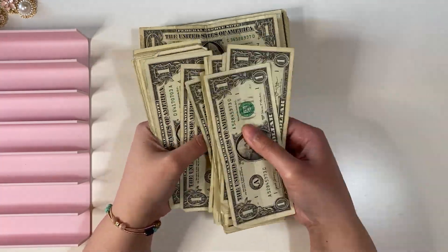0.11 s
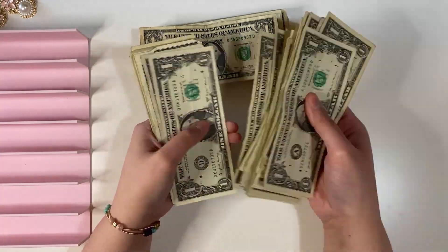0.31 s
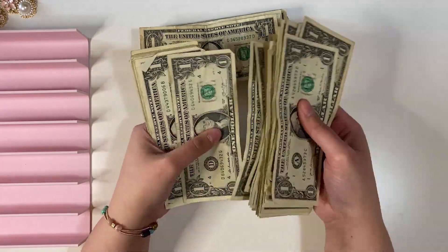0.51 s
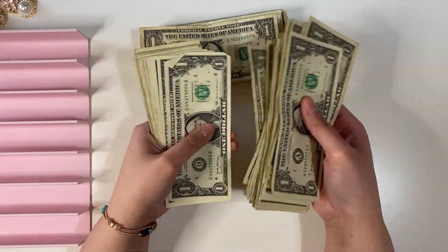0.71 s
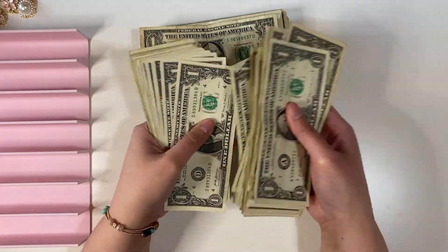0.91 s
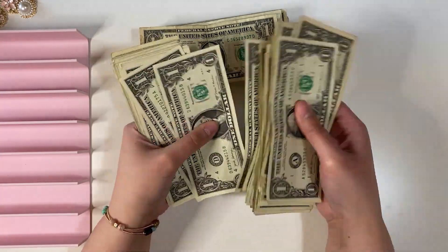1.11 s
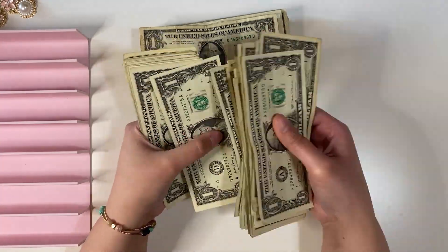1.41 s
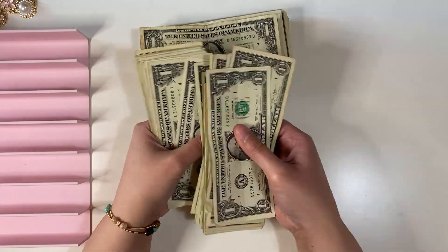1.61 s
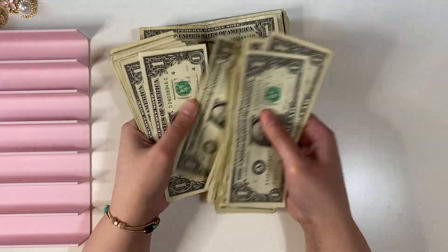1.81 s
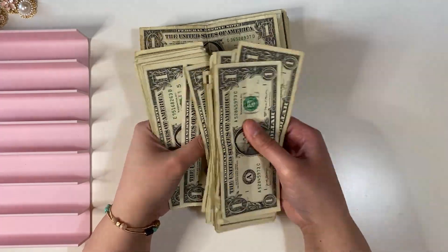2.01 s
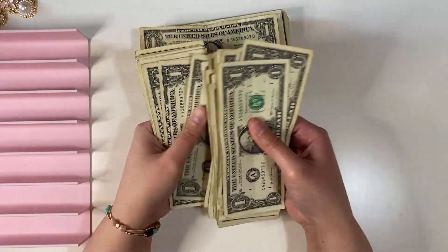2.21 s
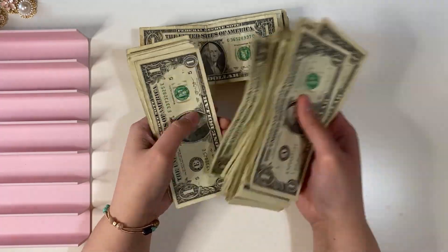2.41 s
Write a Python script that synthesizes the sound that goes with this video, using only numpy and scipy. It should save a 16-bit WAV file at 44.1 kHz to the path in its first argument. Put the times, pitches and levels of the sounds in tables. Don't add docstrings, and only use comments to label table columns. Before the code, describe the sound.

Thumbed banknotes rustle and flick one after another, brief dry hisses leading into dull papery pops and a few sharp snaps; close phone pickup, nearly mono, very short desk reflection, quiet indoor room.

```python
import sys
import numpy as np
from scipy import signal
from scipy.fft import rfft, irfft
from scipy.io import wavfile
from scipy.ndimage import uniform_filter1d

SR = 44100
rng = np.random.default_rng(int(sys.argv[2]) if len(sys.argv) > 2 else 0)


def unload_audio(sound):
    columns = np.transpose(np.atleast_2d(sound))
    steps = np.round(np.clip(columns, -1, 1) * 32767)
    wavfile.write(sys.argv[1], SR, steps.astype(np.int16))


def volts_from_decibels(level):
    exponent = np.asarray(level, float) / 20
    return 10 ** exponent


N = 114660


def unit(x):
    return x / np.sqrt(np.mean(x ** 2))


def band(x, hz, width_hz):
    return signal.lfilter(*signal.iirpeak(hz, hz / width_hz, fs=SR), x)


def bands(x, table):
    return unit(sum(volts_from_decibels(db) * band(x, hz, width_hz) for hz, width_hz, db in table))


def highpass(x, order, hz):
    return signal.sosfilt(signal.butter(order, hz, "high", fs=SR, output="sos"), x)


def curve(table, hz):
    table = np.array(table, float)
    return np.interp(np.log(hz + 1), np.log(table[:, 0]), table[:, 1])


def add(out, start_s, x):
    i = int(start_s * SR)
    out[i:i + len(x)] += x[:N - i]


def grit(per_s, spread_db, hiss):
    chance, sign, size = rng.random((3, N))
    slips = (chance < per_s / SR) * np.sign(sign - 0.5) * volts_from_decibels(spread_db * (2 * size - 1))
    return unit(slips) + hiss * rng.standard_normal(N)


def flicker(rate_hz, depth_db):
    hold = int(SR / rate_hz)
    steps = np.repeat(rng.standard_normal(N // hold + 1), hold)
    return volts_from_decibels(depth_db * unit(uniform_filter1d(steps, hold)[:N]))


# [start_s, length_s, hiss_db, pocket_ring_db, airy_db]
SLIDE_EVENTS = [(0, 0.11, -68, -65.5, -73.5), (0.166, 0.039, -62, -61.5, -64),
                (0.199, 0.03, -50.5, -53, -62.5), (0.308, 0.068, -61.5, -63.5, -67),
                (0.354, 0.043, -61, -62, -56.5), (0.507, 0.051, -58.5, -50.5, -63.5),
                (0.561, 0.029, -53.5, -48.5, -57), (0.623, 0.035, -72.5, -75.5, -72),
                (0.731, 0.088, -59, -58.5, -60), (0.853, 0.086, -69, -63.5, -73),
                (0.91, 0.033, -53.5, -69, -56.5), (0.945, 0.024, -64.5, -58, -66),
                (1.139, 0.13, -65.5, -62.5, -86), (1.212, .035, -56, -56.5, -55),
                (1.259, 0.017, -58.5, -58, -69.5), (1.359, 0.045, -56.5, -60, -63.5),
                (1.4, 0.043, -58.5, -52, -56.5), (1.495, 0.024, -56.5, -50.5, -63),
                (1.517, 0.024, -52, -51.5, -63), (1.56, 0.027, -66, -46.5, -48)]
LATER_SLIDE_EVENTS = [(1.671, 0.054, -60, -60, -65.5), (1.728, 0.022, -51, -40.5, -58.5),
                      (1.775, 0.029, -55, -56, -61.5), (1.913, 0.027, -56, -58.5, -61.5),
                      (1.936, 0.035, -46.5, -51.5, -53), (1.968, 0.026, -64.5, -63.5, -77),
                      (2.071, 0.069, -66, -70, -73), (2.131, 0.096, -61, -68, -68.5),
                      (2.215, 0.028, -55, -55.5, -67), (2.283, 0.026, -60, -53, -65.5),
                      (2.32, 0.027, -57, -43.5, -62.5), (2.422, 0.067, -58, -55.5, -60.5), ]
# [time_s, level_db]
CREEP_LEVELS = [(0, -72.5), (.1, -104), (.14, -92), (.2, -75), (.44, -72.5), (.48, -82.5), (.6, -76.5),
                (.84, -80.5), (1.05, -74), (1.12, -85), (1.2, -69), (1.33, -77.5), (1.6, -72.5),
                (1.86, -84), (1.95, -73), (2.04, -82.5), (2.2, -72), (2.6, -76)]
# [pitch_hz, width_hz, level_db]
PAPER_RINGS = [
    (2266, 660, 0.5),
    (2670, 340, -2.5),
    (3780, 270, 0.5),
    (5100, 1650, 1.5),
    (6440, 1100, -4.5),
]
# [pitch_hz, width_hz, level_db]
AIRY_RINGS = [
    (8830, 6600, 11),
    (14700, 2200, 2.5),
]


def slides():
    t = np.arange(N) / SR
    creep_db = np.interp(t, *np.array(CREEP_LEVELS, float).T)
    power = volts_from_decibels(2 * (creep_db + np.array([[0], [-1.5], [0]])))
    fade_share = 0.33
    for start_s, length_s, *levels_db in SLIDE_EVENTS + LATER_SLIDE_EVENTS:
        progress = (t - start_s) / length_s
        fade = np.clip(np.minimum(progress, 1 - progress) / fade_share, 0, 1)
        power += np.outer(volts_from_decibels(2 * np.array(levels_db)), fade ** 2)
    paper, pocket, air = np.sqrt(power) * flicker(150, depth_db=2.5)

    pocket_hz, pocket_width_hz = 950, 507
    ring = band(grit(300, spread_db=0.0, hiss=0.85), pocket_hz, pocket_width_hz)
    ring = unit(band(ring, pocket_hz, 3 * pocket_width_hz))

    crinkle = np.zeros(N)
    for hz, width_hz, db in PAPER_RINGS:
        wobble = flicker(200, depth_db=2.5)
        crinkle += volts_from_decibels(db) * wobble * band(grit(450, spread_db=1.5, hiss=0.81), hz, width_hz)

    breath = bands(highpass(grit(2390, spread_db=2.5, hiss=0.68), 4, 6500), AIRY_RINGS)
    return paper * unit(crinkle) + pocket * ring + air * breath


# [start_s, peak_db, settled_pitch_hz, swell_ms]
POP_EVENTS = [(0.202, -16.5, 987, 1.14), (0.2132, -28.5, 1070, 0.91), (0.2178, -33, 950, 1.6),
              (0.3294, -35.5, 1070, 1.2), (0.334, -30, 1010, 0.9), (0.3373, -16.5, 866, 1.62),
              (.3405, -27, 776, 1.2), (.351, -38, 1020, 1.9), (.539, -27.5, 950, 0.33),
              (0.5679, -25, 973, 1.97), (0.58, -38, 984, 2.1), (0.725, -45.5, 846, 2),
              (0.92, -47, 1300, 0.81), (0.9217, -20.5, 806, 0.89), (0.9238, -22, 879, 1.6),
              (.927, -34, 860, 3.5), (1.209, -36.5, 1080, 2.3), (1.236, -38, 1014, 2.4),
              (1.2587, -39.5, 754, 1.02), (1.407, -45, 990, 2.8)]
LATER_POP_EVENTS = [(1.5026, -38.5, 1266, 3.4), (1.5438, -27.5, 914, 0.85), (1.561, -34, 946, 2.1),
                    (1.567, -24, 1790, 1.09), (1.728, -41, 930, 2), (1.7313, -28, 679, 2),
                    (1.7346, -22.5, 950, 1.1), (1.7379, -26.5, 1046, 1.58), (1.779, -39.5, 872, 2.5),
                    (1.92, -32.5, 680, 1.04), (1.9426, -25.5, 1087, 2.2), (1.9539, -31, 753, 1.34),
                    (2.1302, -29, 1155, 1.23), (2.3153, -20.5, 887, 1.07), (2.3284, -30, 900, 1.42),
                    (2.333, -41, 1090, 1.3), (2.444, -40.5, 984, 2.5)]


def pops():
    out, t = np.zeros(N), np.arange(1500) / SR
    sweep, sweep_s = 4.44, 0.00026
    thud_hz, thud_db = 340, -15.5
    puff = volts_from_decibels(thud_db) * np.cos(2 * np.pi * thud_hz * t)
    for start_s, db, hz, swell_ms in POP_EVENTS + LATER_POP_EVENTS:
        u = t / (swell_ms / 1000)
        swell = u ** 2 * np.exp(2 * (1 - u ** 1.267))
        turns = hz * (t + sweep * sweep_s * (1 - np.exp(-t / sweep_s)))
        add(out, start_s, volts_from_decibels(db - 2) * swell * (np.sin(2 * np.pi * turns) + puff))
    return highpass(out, 2, 220)


# [start_s, peak_db, centre_hz, t60_s (time to fall 60 dB), airy_share_db]
CRACK_EVENTS = [(.2178, -28, 3500, 0.0054, -17), (0.337, -22.5, 4750, 0.025, -42),
                (0.338, -29.5, 3280, 0.014, 5), (0.3714, -30, 5500, 0.011, 5),
                (.9208, -20.5, 2050, 0.019, -9), (0.9227, -24.5, 4770, .015, -6.5),
                (1.2589, -37, 3580, 0.006, -14), (1.5432, -26.5, 3000, 0.011, -8),
                (1.5667, -10.5, 3910, 0.0065, -50), (1.734, -32.5, 2340, 0.014, -5),
                (1.9192, -31, 2040, 0.017, -26), (1.942, -25.5, 2530, 0.019, -16),
                (1.954, -31, 3010, 0.0116, 0.5), (2.1303, -28, 2010, 0.0062, -29),
                (2.315, -31.5, 3500, 0.023, -29.5), (2.3327, -45, 4600, 0.015, 1.5),
                (.522, -35, 2590, 0.083, -12), (0.53, -35.5, 5100, 0.059, -12),
                (1.527, -36.5, 2030, 0.12, -31.5), (1.5672, -18.5, 4950, 0.016, -9.5)]


def cracks():
    out, t = np.zeros(N), np.arange(3000) / SR
    width_share = 0.3
    for start_s, db, hz, t60_s, air_db in CRACK_EVENTS:
        noise = rng.standard_normal(3000)
        decay = volts_from_decibels(-60 * t / t60_s)
        shape = np.minimum(t / (0.012 * t60_s), 1) * decay
        tone = np.sin(2 * np.pi * hz * t) * decay
        rasp = unit(band(band(noise, hz, width_share * hz), hz, hz))
        edge = volts_from_decibels(air_db) * bands(noise, AIRY_RINGS)
        add(out, start_s, volts_from_decibels(db - 1.5) * shape * 0.5 * (0.35 * tone + 0.81 * rasp + edge))
    return out


# [start_s, peak_db, pitch_hz, swell_ms]
TICK_EVENTS = [(.006, -54, 560, 1.8), (.063, -62, 980, 1.6), (.079, -52, 1070, 2.4), (.314, -55, 840, 1.6),
               (.3465, -43, 1300, 2.4), (.3375, -25.5, 3050, 0.85), (.3385, -37, 4800, 1.1),
               (.3715, -34.5, 5500, 0.73), (.372, -36.5, 2020, 1.1), (.516, -50, 2050, 1.3),
               (.522, -58, 2550, 1.2), (.5235, -47, 4870, 1.9), (.528, -48, 4930, 1.4),
               (.532, -41, 5170, 1.3), (.5345, -34.5, 2660, 0.69), (.534, -38, 950, 1.6),
               (.747, -51, 800, 2.8), (.9205, -28, 2070, 0.6), (.9225, -28, 1900, 0.52),
               (.9225, -32, 6250, 1), (.9245, -37, 1260, 1.5), (.954, -52, 980, 2), (1.047, -54, 990, 1.5),
               (1.375, -56, 960, 2.6), (1.436, -42.5, 926, 2), (1.525, -42.5, 910, 2.3),
               (1.529, -37.5, 1930, 3.1), (1.5675, -27.5, 3900, 0.92), (1.694, -51, 1084, 2.9),
               (2.105, -51.5, 1100, 2.3), (2.1318, -32.5, 944, 0.59), (2.209, -50, 2240, 2.7),
               (2.224, -52, 1030, 2.3), (2.227, -46, 2950, 1.2), (2.288, -55, 1170, 2),
               (2.437, -53.5, 1000, 2.2), (2.457, -47.5, 910, 1.6), (2.47, -46.5, 1010, 2.1),
               (2.574, -61.5, 740, 3), (.514, -51.5, 550, 2.4), (.541, -40, 860, 1.1),
               (1.219, -44.5, 950, 2.6), (1.198, -45, 950, 1.4), (1.43, -51.5, 512, 2.9),
               (1.531, -36.5, 2370, 1.4), (1.743, -50, 950, 1.8), (1.948, -44, 950, 1.1),
               (1.965, -45, 1080, 1.5), (1.98, -52, 1000, 1.2), (0, -53.5, 940, 2.7)]


def ticks():
    out, t = np.zeros(N), np.arange(1500) / SR
    for start_s, db, hz, swell_ms in TICK_EVENTS:
        u = t / (swell_ms / 1000)
        swell = u * np.exp(1 - u ** 1.58)
        add(out, start_s, volts_from_decibels(db) * swell * np.sin(2 * np.pi * hz * t))
    return out


def desk_echo(notes):
    level_db, t60_s, lowest_hz, top_hz = -18.5, 0.05, 500, 4300
    t = np.arange(4000) / SR
    tails = rng.standard_normal((2, 4000)) * volts_from_decibels(-60 * t / t60_s) * (t > 0.001)
    tails = signal.lfilter(*signal.butter(3, [lowest_hz, top_hz], "band", fs=SR), tails)
    echo = [signal.fftconvolve(notes, tail / np.linalg.norm(tail))[:N] for tail in tails]
    return volts_from_decibels(level_db) * np.array(echo)


# [pitch_hz, level_db per Hz]
ROOM_COLOUR = [
    (12, -41),
    (20, -9.5),
    (67, 0.5),
    (99, -2),
    (237, -17),
    (382, -26.5),
    (6530, -62),
    (15200, -67.5),
    (16500, -69),
]


def room():
    colour = volts_from_decibels(curve(ROOM_COLOUR, np.fft.rfftfreq(N, 1 / SR)))
    return unit(irfft(rfft(rng.standard_normal(N)) * colour, N)) * volts_from_decibels(-59)


def scene():
    notes = pops() + ticks() + cracks() + slides()
    echo = desk_echo(notes)
    wide_room = volts_from_decibels(-22) * np.array([room(), room()])
    return notes + room() + echo + wide_room


# [pitch_hz, level_db]
LEFT_MINUS_RIGHT = [
    (60, -1.9),
    (200, -4.3),
    (330, -7.5),
    (600, -4),
    (1200, -1.9),
    (4400, -1.7),
]


def two_ports(dry):
    hz = np.fft.rfftfreq(N, 1 / SR)
    lag_s, lag_from_hz, soft_hz = 1.6e-4, 4225, 700
    ripple, bass_lead = 0.2, 0.15
    bump, bump_hz, bump_width_hz = 0.6, 2900, 700
    lead = 2 * np.pi * lag_s * soft_hz * np.logaddexp(0, (hz - lag_from_hz) / soft_hz)
    lead = lead - ripple * np.sin(lead)
    lead = lead + bass_lead * np.tanh(hz / 300) * (hz < lag_from_hz)
    lead = lead + bump * np.exp(-((hz - bump_hz) / bump_width_hz) ** 2)

    lean_db = curve(LEFT_MINUS_RIGHT, hz) * np.clip(3 - hz / 2200, 0, 1)
    half = volts_from_decibels(lean_db / 2) * np.exp(0.5j * lead)
    top = volts_from_decibels(-32 * (hz > 15900))
    return irfft(rfft(dry) * np.array([half, 1 / half]) * top, N)


# [pitch_hz, width_hz, depth_db]
QUIET_DIPS = [
    (7300, 520, -12),
    (13700, 700, -12),
]


def quiet_dips(x):
    hz = np.fft.rfftfreq(N, 1 / SR)
    bright_from_hz, fill_db = 4225, -52
    null_db = sum(db * np.exp(-((hz - at_hz) / width_hz) ** 4) for at_hz, width_hz, db in QUIET_DIPS)
    mid = rfft(x.mean(axis=0))
    bright = uniform_filter1d(irfft(mid * (hz > bright_from_hz), N) ** 2, size=900)
    removed = irfft(mid * (1 - volts_from_decibels(null_db)), N)
    return x - removed / (1 + (bright / volts_from_decibels(2 * fill_db)) ** 2)


def band_limit(x):
    return signal.sosfilt(signal.butter(12, 17160, fs=SR, output="sos"), x)


def record(dry):
    return band_limit(quiet_dips(two_ports(dry)))


dry = scene()
out = record(dry)
unload_audio(out)
```